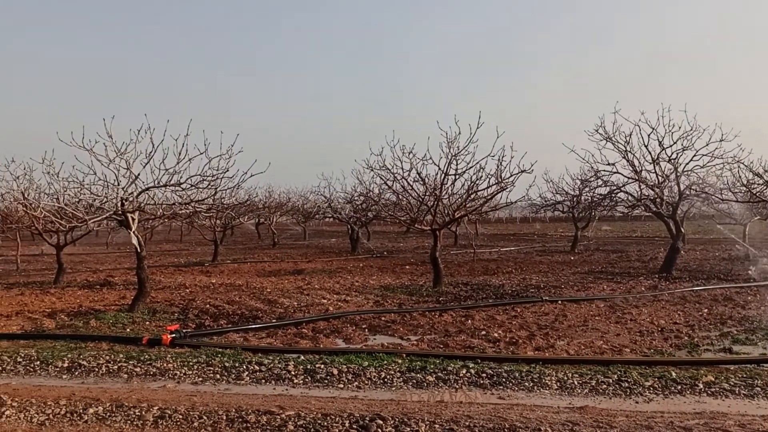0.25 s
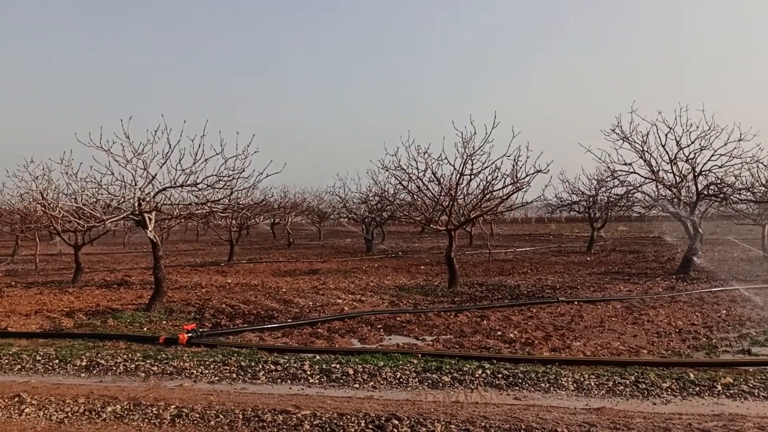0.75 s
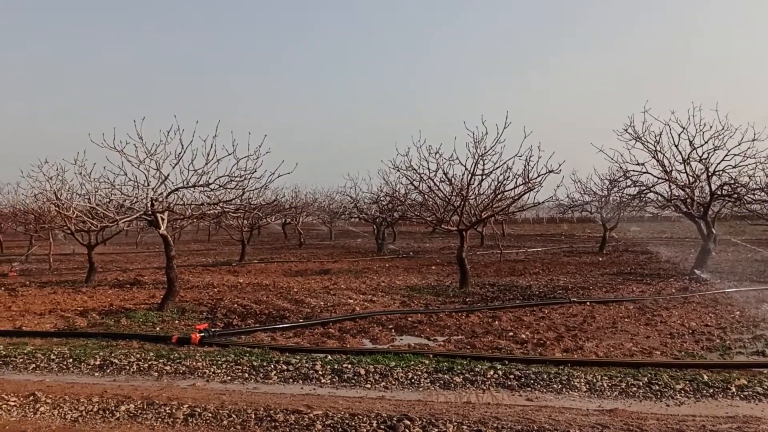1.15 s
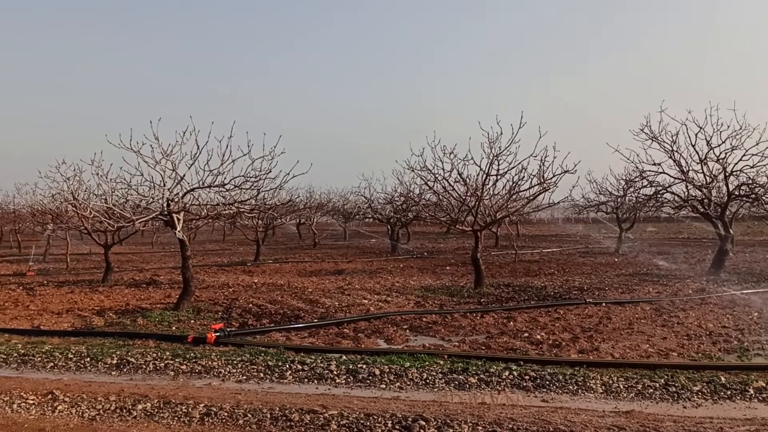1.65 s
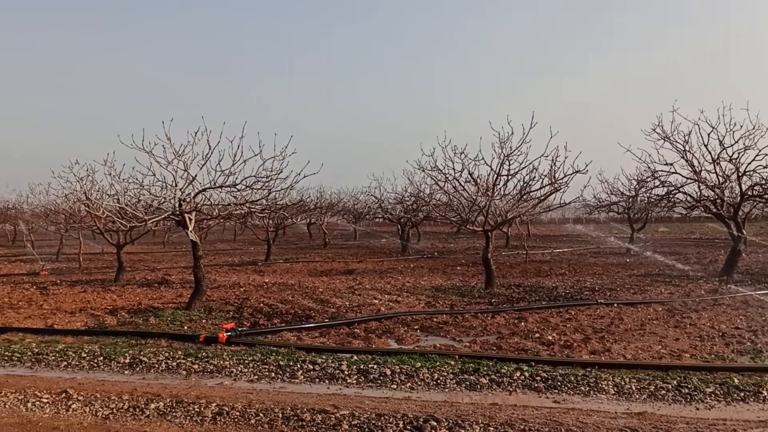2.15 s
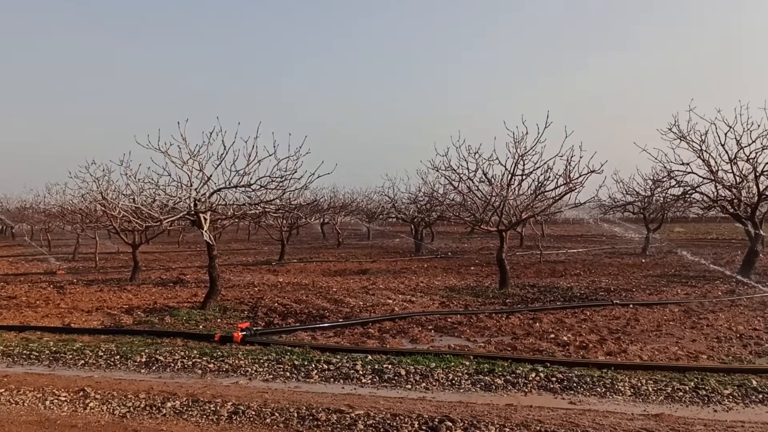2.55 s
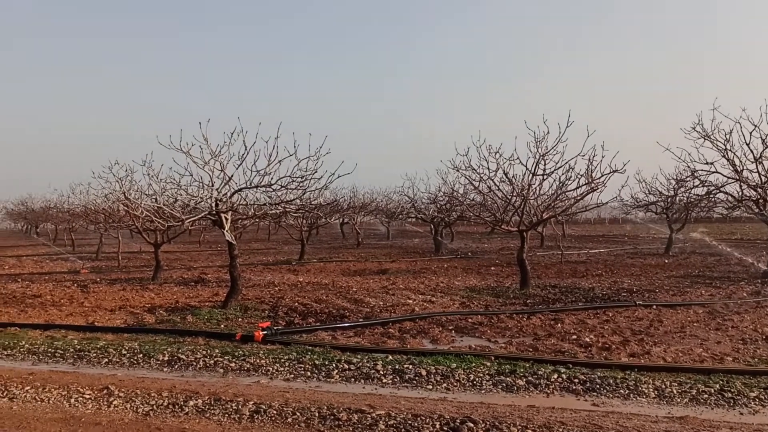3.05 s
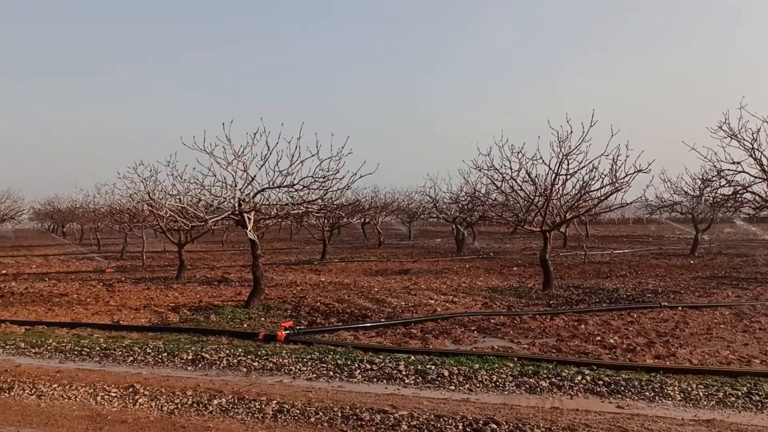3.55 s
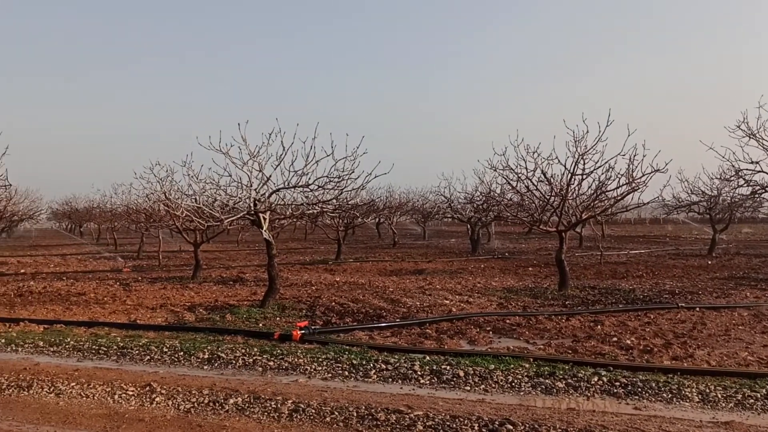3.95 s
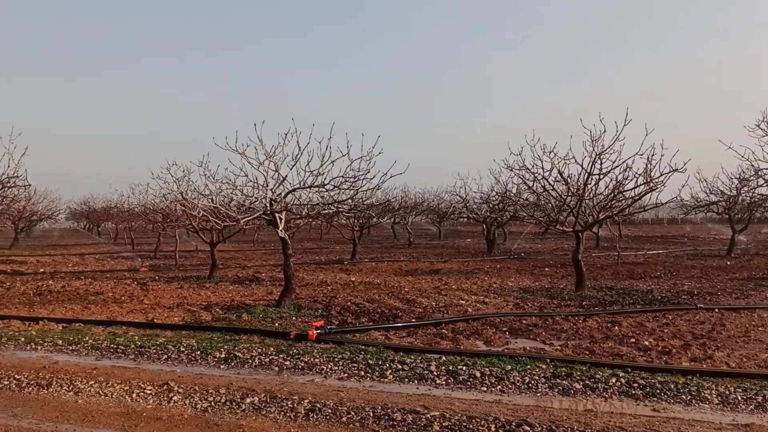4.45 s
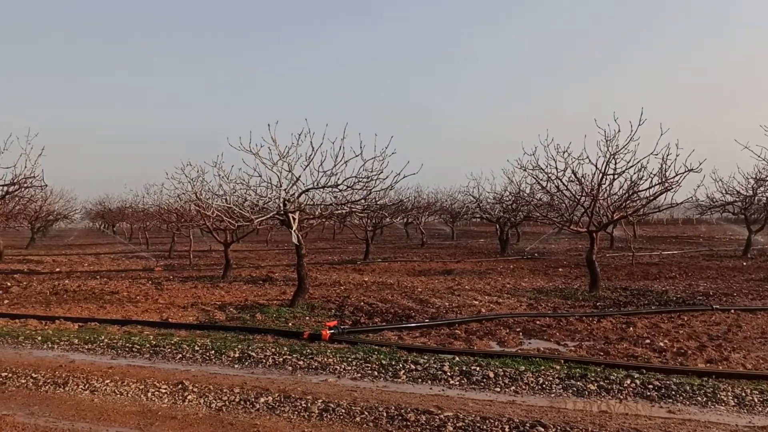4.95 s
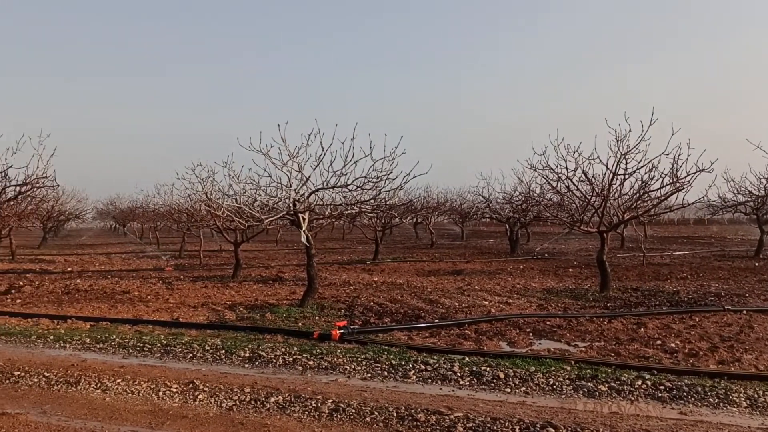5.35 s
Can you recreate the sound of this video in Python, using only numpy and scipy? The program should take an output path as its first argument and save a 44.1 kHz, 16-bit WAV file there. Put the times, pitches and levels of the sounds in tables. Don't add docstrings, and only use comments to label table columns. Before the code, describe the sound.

In an open orchard, a close impact sprinkler rattles rapidly for about 1.7 seconds, slows to steady spitting ticks of about eight or nine per second, then bursts into fast chatter near the end. Fainter heads tick behind a constant hiss. Wind thumps softly on a small, thin camera microphone, and one drop pops loudly near the middle.

```python
import sys
import numpy as np
from scipy import signal
from scipy.fft import rfft, irfft, next_fast_len
from scipy.io import wavfile
from scipy.ndimage import uniform_filter1d

SR = 44100
rng = np.random.default_rng(int(sys.argv[2]) if len(sys.argv) > 2 else 0)


def waveform_to_disk(signal):
    frames = np.transpose(np.atleast_2d(signal))
    scaled = np.clip(frames, -1, 1) * 32767
    samples = np.round(scaled).astype(np.int16)
    wavfile.write(sys.argv[1], SR, samples)


def invert_db(x):
    u = np.asarray(x, float) / 20
    return 10 ** u


N = 246508
T = np.arange(N) / SR
PADDED = next_fast_len(N, real=True)

# (time [s], knock level [dB], splash level [dB])
RETURN_AWAY = [(0.2033, -38.5, -45), (0.238, -41, -48), (0.274, -41, -46.5), (0.3885, -47, -44.5),
               (0.4296, -29.5, -47), (0.4691, -43, -49.5), (0.509, -28.5, -45), (0.591, -27, -45),
               (0.6721, -28.5, -44.5), (0.7505, -48, -49.5), (0.835, -45, -49), (0.9969, -49, -45.5),
               (1.0806, -29, -44.5), (1.1211, -32, -43), (1.167, -25.5, -43.5), (1.2144, -24.5, -44),
               (1.2543, -26, -44.5), (1.295, -57, -46.5), (1.3401, -38, -45), (1.38, -33, -50),
               (1.4263, -28.5, -43), (1.4703, -30.5, -43), (1.5128, -31, -45), (1.554, -29, -43),
               (1.6, -27, -46.5), (1.6436, -27.5, -47.5), (1.6834, -46, -41), (1.7247, -41, -49.5)]
# (time [s], knock level [dB], splash level [dB], treble click level [dB])
RETURN_NEAR = [(4.9115, -31.5, -42.5, -29.5), (4.9501, -51, -45.5, -62), (4.987, -30, -41, -62),
               (5.1444, -27, -40.5, -62), (5.1866, -54, -47.5, -38), (5.2245, -29, -39, -62),
               (5.2674, -28, -40.5, -34), (5.3094, -31, -41.5, -34), (5.35, -31, -39.5, -56),
               (5.3913, -25.5, -42, -62), (5.433, -45, -44, -62), (5.4784, -28, -40.5, -62),
               (5.5221, -27.5, -41.5, -62), (5.5662, -30, -42, -62)]
# (time [s], knock level [dB], splash level [dB])
FORWARD = [(0.079, -58, -43), (1.8337, -46, -41.5), (1.955, -37, -43.5), (2.0711, -37, -44),
           (2.188, -36, -46.5), (2.303, -31.5, -43.5), (2.417, -31.5, -40.5), (2.5358, -36, -43.5),
           (2.6519, -30.5, -42), (2.767, -37.5, -37.5), (2.885, -32.5, -46), (3.001, -32.5, -42),
           (3.1193, -30.5, -41), (3.234, -29, -38.5), (3.352, -36, -39), (3.4682, -34, -41),
           (3.5845, -29.5, -36.5), (3.705, -30.5, -40.5), (3.8197, -28.5, -37), (3.9357, -30.5, -37),
           (4.053, -28.5, -38), (4.1706, -30.5, -40), (4.2874, -27.5, -40), (4.404, -33, -39),
           (4.5207, -27.5, -39), (4.6385, -29.5, -42.5), (4.757, -33, -40), (4.873, -28, -39)]
# (time [s], treble over body of the splash [dB])
AIM = [(0, 0), (.5, -4), (.9, -6.5), (1.2, -1), (1.5, 1), (1.85, -2), (2.4, -0.5), (3.1, -3.5), (3.8, -1),
       (4.1, 8), (4.55, 4), (4.85, 3), (5.05, 5.5), (5.35, 0.5), (5.59, 2)]
# (frequency [Hz], frequency [Hz])
ARM_RING_HZ = (3950, 7350)
# (frequency [Hz], level [dB])
QUICK_TINT = [(1000, -20.5), (3000, 1.5), (4200, 2), (5500, -8.5), (6400, 1.5), (7200, 0.5), (7550, 2.5),
              (7900, 4.5), (9300, 1.5), (11700, -1.5), (12700, -6.5), (14300, 1.5), (15700, -2)]
SLOW_TINT = [(800, -3), (2000, -9), (4000, -0.5), (5600, -9), (7400, -1), (9400, 0), (12000, -1),
             (15000, -1)]
# (frequency [Hz], level [dB])
WHISTLE = [(6800, -1), (7350, -13), (7560, 1), (7760, 4)]
# (frequency [Hz], density [dB per Hz])
WATER = [(700, -28.5), (2600, -21.5), (3700, -4), (4200, -1.5), (5300, -3), (5900, -7), (7500, 3.5),
         (8500, -18.5), (9500, -19.5), (10400, -16), (11700, -15.5), (12400, -18.5), (14200, -20),
         (15700, -22.5)]
# (frequency [Hz], frequency [Hz])
SPLIT_HZ = (5500, 10000)
# (time [s], low level [dB], high level [dB])
FAR_HEADS = [(0.005, -68, -49), (1.458, -61, -53), (1.8022, -54, -48), (1.901, -54, -66),
             (2.0003, -53, -61), (2.11, -52, -49), (2.24, -50, -64), (2.34, -49, -56), (2.51, -50, -70),
             (3.046, -50, -45), (3.181, -52, -46), (3.3136, -43.5, -44), (3.397, -39.5, -59),
             (3.4395, -44, -61), (3.5313, -55, -56), (3.761, -47.5, -64), (3.855, -55, -59),
             (3.985, -52, -58), (4.111, -48.5, -65), (4.2, -45, -55), (4.2467, -48, -52), (4.337, -53, -64),
             (4.4707, -49, -49), (4.601, -50, -57)]
# (time [s], level [dB])
SPRAY = [(0, -59), (.17, -68), (.45, -54.5), (1.54, -57), (1.87, -56.5), (2.79, -59.5), (3.39, -50.5),
         (3.7, -56), (4.84, -55), (5.08, -54), (5.59, -49.5)]
# (level at middling spray [dB], share of its change [1])
SPRAY_BANDS = [
    (-57, 0.97),
    (-62.5, 1.1),
    (-69.5, 0.33),
]
# (time [s], peak level [dB], ring [Hz], push 1 or pull -1)
POPS = [
    (2.91251, -13.3, 1000, -1),
    (5.4553, -30.5, 1000, 1),
]
# (time [s], level [dB], frequency [Hz])
DRIPS = [
    (4.581, -54, 1790),
    (4.69, -49.5, 1790),
    (4.74, -56, 1780),
    (4.80, -50, 2040),
    (4.85, -56, 1950),
    (4.87, -46.5, 780),
    (4.885, -57, 1720),
    (4.9, -55, 1910),
    (4.657, -48.5, 830),
]
# (time [s], level [dB])
WIND = [(0, -64), (.14, -61), (.76, -66), (1.22, -60.5), (1.3, -49), (1.52, -47.5), (1.7, -54), (1.8, -43),
        (1.95, -48), (2.45, -48), (2.62, -58), (2.9, -57.5), (3.2, -52), (3.5, -59), (4.39, -62),
        (4.95, -51), (5.4, -53), (5.5, -50)]
# (frequency [Hz], density [dB per Hz])
RUMBLE = [(25, -22), (50, -3), (80, -2.5), (150, -7.5), (210, -12.5), (400, -64)]
UPPER_RUMBLE = [(100, -19), (200, -2.5), (300, -3.5), (500, -18), (900, -37.5)]
# (time [s], peak level [dB], frequency [Hz], push 1 or pull -1)
PUFFS = [(1.347, -35, 137, 1), (1.3763, -30, 110, -1), (1.388, -35.5, 136, 1), (1.4385, -31, 117, -1),
         (1.5273, -32.5, 147, -1), (1.611, -34, 101, 1), (1.7594, -34.5, 102, -1), (1.7733, -28, 164, 1),
         (1.854, -27, 108, -1), (1.8685, -21.5, 212, 1), (1.886, -28.5, 77, -1), (1.968, -35, 114, -1),
         (2.0884, -33, 117, 1), (2.099, -35.5, 141, 1), (2.183, -32, 177, 1), (2.3586, -40, 115, -1),
         (2.424, -33, 134, 1), (2.4372, -30, 114, -1), (2.4676, -36, 106, 1), (2.5597, -36, 168, 1),
         (2.7279, -31, 110, -1), (2.956, -32.5, 121, 1), (2.9968, -38, 154, 1), (3.092, -41, 130, -1),
         (4.0683, -36.5, 110, -1), (4.3499, -42, 99, -1), (5.0264, -37.5, 153, -1), (5.4776, -32.5, 116, 1),
         (5.5011, -34.5, 124, 1), (5.5264, -35.5, 110, 1)]
# (frequency [Hz], density [dB per Hz])
FIELD = [(18, -26), (30, 3), (64, 3), (95, 4), (154, -6), (297, -8), (618, -5.5), (1140, -15.5),
         (1820, -18), (2430, -23), (3000, -21.5), (3900, -14.5), (6600, -120)]
# (frequency [Hz], density [dB per Hz])
MIST = [(1500, -21.5), (2500, -10.5), (5500, 6), (9000, -1), (11000, -12), (16000, -52)]
# (time [s], level [dB])
PATTER = [
    (0, -83),
    (4.45, -75),
    (4.7, -67.5),
    (5.59, -68),
]
# (frequency [Hz], ..)
EDGES_HZ = (4800, 6100, 7650, 8550, 11560, 15800)
# (step [dB], ..)
STEPS_DB = (-11.5, 10, -4.5, -15.5, 16.5, -41)
# (from [Hz], to [Hz], depth under the resonance [dB])
WEAK_BANDS = [
    (9100, 9650, 36.5),
    (9650, 10400, 39.5),
]


def near_head():
    away_rows = quick_swings(RETURN_AWAY, soft_click_db=-65)
    near_rows = quick_swings(RETURN_NEAR, soft_click_db=-48)
    s, knock_db, splash_db = np.transpose(FORWARD)
    slow_rows = water_rows(s, knock_db - 5.5, knock_db, splash_db)
    away = sweep(away_rows, lead_s=[.007, .003, .005], length_s=0.029, skew=0.8,
                 rise_s=0.0024, fall_s=0.002, fizz_db=-29, tail_db=-4.0, tail_s=0.014)
    near = sweep(near_rows, lead_s=[.007, .005, .006], length_s=0.028, skew=0.74,
                 rise_s=0.0014, fall_s=0.0015, fizz_db=-29, tail_db=-15.0, tail_s=0.016)
    slow = sweep(slow_rows, lead_s=[.0015, .0012, .0013], length_s=0.025, skew=0.44,
                 rise_s=0.00061, fall_s=0.003, fizz_db=-26, tail_db=-20, tail_s=0.04)

    knock_noise, splash_noise = three_bands(), grainy_water()
    rattle = knock_noise * invert_db([[-9], [.1], [.1]])
    behind = (np.sqrt(away[0]) * rattle + np.sqrt(away[1]) * splash_noise).sum(0)
    front = (np.sqrt(near[0]) * rattle + np.sqrt(near[1]) * splash_noise).sum(0)
    forth = (np.sqrt(slow[0]) * knock_noise + np.sqrt(slow[1]) * splash_noise).sum(0)
    whistle_from_s, whistle_full_s = 0.37, 1.65
    turned = np.clip((T - whistle_from_s) / (whistle_full_s - whistle_from_s), 0, 1)
    back = turned * coloured(behind, WHISTLE) + (1 - turned) * invert_db(-1.5) * behind + front
    water = coloured(back, QUICK_TINT) + coloured(forth, SLOW_TINT)

    low_hz, high_hz = ARM_RING_HZ
    back_rows, forth_rows = np.vstack([away_rows, near_rows]).T, slow_rows.T
    rings = arm_rings(back_rows[0], back_rows[1] + 0.82, low_hz, lag_s=0.001532, width_s=0.00068)
    rings += arm_rings(forth_rows[0], forth_rows[2] + 0.5, high_hz, lag_s=.0016, width_s=0.00067)
    return coloured(water, WATER) + rings


def quick_swings(blows, soft_click_db):
    swing_s, soft_knock_db, soft_splash_db = .041, -52, -2.5
    s, knock_db, splash_db, *click_db = np.transpose(blows)
    hard = np.append(0, np.cumsum(np.round(np.diff(s) / swing_s))).astype(int)
    k = np.arange(hard[-1] + 1)
    low = np.full(len(k), soft_knock_db, float)
    high = np.full(len(k), soft_click_db, float)
    low[hard] = knock_db
    high[hard] = click_db[0] if click_db else soft_click_db
    splash = np.interp(k, hard, splash_db) + soft_splash_db * ~np.isin(k, hard)
    return water_rows(np.interp(k, hard, s), low, high, splash)


def water_rows(s, low_db, high_db, splash_db):
    tilt = np.interp(s, *np.transpose(AIM))
    fizz = -58 + 0.43 * (splash_db + 43.5) - 0.27 * tilt
    return np.transpose([s, low_db + 0 * s, high_db + 0 * s, splash_db - tilt / 2, splash_db + tilt / 2, fizz])


def sweep(rows, lead_s, length_s, skew, rise_s, fall_s, fizz_db, tail_db, tail_s):
    s, low, high, *splash = np.transpose(rows)
    t = np.arange(4000) / SR
    knock = (1 - np.exp(-t / rise_s)) * np.exp(-t / fall_s)
    knocks = train(s, [low, high, high + fizz_db], knock / knock.max(), lead_s=0.00087)
    tail = invert_db(tail_db) ** 2 * (1 - np.exp(-t / .008)) * np.exp(-t / tail_s)
    splashes = train(s, splash, hump(length_s, skew), lead_s) + train(s, splash, tail)
    return knocks, splashes


def hump(length_s, skew):
    return np.sin(np.pi * np.linspace(0, 1, round(length_s * SR)) ** skew) ** 2


def arm_rings(times, levels_db, ring_hz, lag_s, width_s):
    out, t = np.zeros(N + 400), np.arange(400) / SR
    shape = np.exp(-((t - t.mean()) / width_s) ** 2)
    for s, db, (detune, phase) in zip(times, levels_db, rng.standard_normal((len(times), 2))):
        ring = np.sin(2 * np.pi * ring_hz * (1 + .03 * detune) * t + 2 * phase)
        start = round((s + lag_s - t.mean()) * SR)
        out[start:][:400] += invert_db(db) * ring * shape
    return out[:N]


def far_heads():
    s, low, high = far_ticks()
    power = train(s, [low, high, high - 22], hump(0.012, 0.5), 0.00069)
    return coloured((np.sqrt(power) * grainy_water()).sum(0), WATER)


def far_ticks():
    start_s, swing_s, turns_s, fade_db_per_s = 2.0317, .1143, 2.61, -36
    s = np.arange(start_s, 3, swing_s)
    high = -45 + fade_db_per_s * np.maximum(s - turns_s, 0)
    return np.hstack([[s, -53 + 0 * s, high], np.transpose(FAR_HEADS)])


def spray():
    swell = np.interp(T, *np.transpose(SPRAY)) + 56
    hiss = invert_db(np.array([db + share * swell for db, share in SPRAY_BANDS]))
    lumps = np.array([flicker(depth_db, 0.0043) for depth_db in (3.5, 3.6, 1.2)])
    return coloured((hiss * three_bands() * lumps * flicker(1.0, 0.001)).sum(0), WATER)


def drops():
    out = np.zeros(N)
    for s, db, hz, sign in POPS:
        t = T - s
        load = -.24 * np.exp(np.minimum(t, 0) / .0016) * (t < 0)
        ring = np.sin(2 * np.pi * hz * t) * np.exp(-abs(t) / 0.00041) * (t >= 0)
        out += np.sign(sign) * invert_db(db) * uniform_filter1d(load + ring, size=3)
    for s, db, hz in DRIPS:
        burst = rng.standard_normal(N) * np.exp(-((T - s) / .005) ** 2)
        band = signal.butter(N=2, Wn=[0.87 * hz, 1.09 * hz], btype="band", fs=SR)
        out += invert_db(db + 12.5) * signal.lfilter(*band, burst)
    return out


def wind():
    wind_db = np.interp(T, *np.transpose(WIND))
    upper_db = -63 + 0.81 * (wind_db + 52.5)
    lumps = flicker(2.1, .012)
    out = invert_db(wind_db) * lumps * evened(coloured(rng.standard_normal(N), RUMBLE))
    out += lumps * invert_db(upper_db) * evened(coloured(rng.standard_normal(N), UPPER_RUMBLE))
    for s, db, hz, sign in list(PUFFS) + small_eddies():
        start = round((s - .03) * SR)
        u = (T[start:][:2600] - s) * hz
        sway = 0.83 * np.cos(2 * np.pi * u) * np.exp(-(u / 0.56) ** 2)
        crest = 0.49 * np.exp(-(u / 0.13) ** 2)
        out[start:][:len(u)] += np.sign(sign) * invert_db(db) * (sway + crest)
    return out


def small_eddies():
    gap_s, over_wind_db, middle_hz = .11, 9.5, 110
    s = np.arange(.1, T[-1] - .2, gap_s)
    late, size, pitch, sign = rng.uniform(-1, 1, (len(s), 4)).T
    s = s + late * gap_s / 2
    db = np.interp(s, *np.transpose(WIND)) + over_wind_db + 5 * size
    return list(zip(s, db, middle_hz * (1 + .25 * pitch), sign))


def field():
    murmur = invert_db(-58.5) * evened(coloured(rng.standard_normal(N) * flicker(1.0, 0.024), FIELD))
    mist = invert_db(-51) * evened(coloured(rng.standard_normal(N) * flicker(2.75, 0.02), MIST))
    band = signal.butter(N=2, Wn=[1550, 2350], btype="band", fs=SR)
    patter = evened(signal.lfilter(*band, rng.standard_normal(N)))
    return murmur + mist + invert_db(np.interp(T, *np.transpose(PATTER))) * patter


def three_bands():
    z = rfft(rng.standard_normal(N), PADDED)
    part = np.digitize(np.fft.rfftfreq(PADDED, 1 / SR), SPLIT_HZ)
    bands = [irfft(z * (part == k), PADDED)[:N] for k in range(3)]
    return np.array([b / np.std(stepped(coloured(b, WATER))) for b in bands])


def grainy_water():
    return three_bands() * flicker(1.9, 0.0021)


def train(times, levels_db, shape, lead_s=0.):
    spikes = np.zeros((len(levels_db), N))
    at = np.round((times - np.reshape(lead_s, (-1, 1))) * SR).astype(int)
    row = np.arange(len(spikes))[:, None]
    np.add.at(spikes, (row, np.clip(at, 0, N - 1)), invert_db(np.array(levels_db)) ** 2)
    return abs(signal.oaconvolve(spikes, shape[None], axes=1)[:, :N])


def flicker(depth_db, width_s):
    size = max(round(width_s * SR), 2)
    slow = uniform_filter1d(uniform_filter1d(rng.standard_normal(N), size), size)
    return evened(invert_db(depth_db * evened(slow)))


def evened(x):
    return x / np.sqrt(np.mean(x ** 2) + 1e-20)


def coloured(x, points):
    f, db = np.transpose(points)
    hz = np.fft.rfftfreq(PADDED, 1 / SR)
    return irfft(rfft(x, PADDED) * invert_db(np.interp(np.log(hz + 1), np.log(f), db)), PADDED)[:N]


def scene():
    return (near_head() + far_heads() + spray() + drops() + wind() + field())[None]


def stepped(x):
    hz = np.fft.rfftfreq(PADDED, 1 / SR)
    db = sum(step * (1 + np.tanh((hz - edge) / 30)) / 2 for edge, step in zip(EDGES_HZ, STEPS_DB))
    return irfft(rfft(x, PADDED) * invert_db(db), PADDED)[:N]


def masked(x):
    hz, t, z = signal.stft(x, SR, nperseg=1024, noverlap=768)
    power = uniform_filter1d(abs(z) ** 2, size=7, axis=1)
    loud = power[(hz > 6500) & (hz < 7600)].mean(0)
    for lo_hz, hi_hz, depth_db in WEAK_BANDS:
        band = (hz > lo_hz) & (hz <= hi_hz)
        z[band] *= power[band].mean(0) > loud * invert_db(-depth_db) ** 2
    return signal.istft(z, SR, nperseg=1024, noverlap=768)[1][:N]


def low_pass(x):
    return signal.sosfilt(signal.butter(12, 16340, fs=SR, output="sos"), x)


def record(dry):
    low_cut = coloured(dry[0], [(20, -25), (40, -20.5), (62, -9.5), (75, 1.0)])
    mix = masked(stepped(low_cut))[None]
    return low_pass(mix)


dry = scene()
out = record(dry)
waveform_to_disk(out)
```